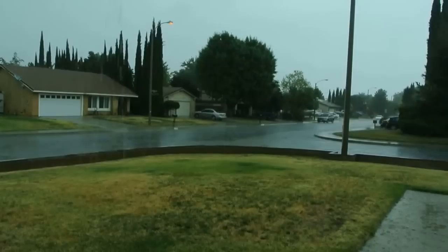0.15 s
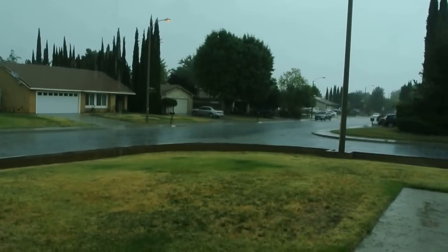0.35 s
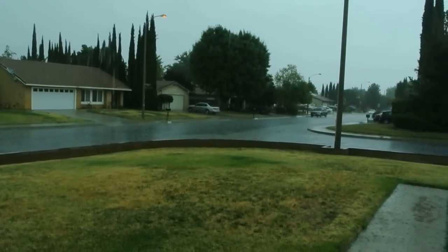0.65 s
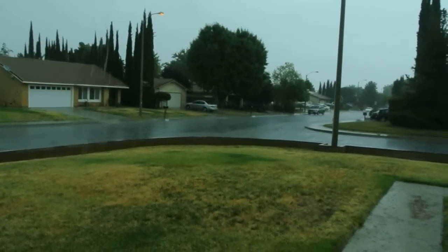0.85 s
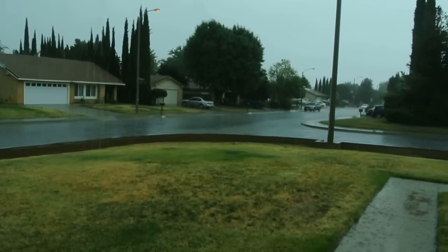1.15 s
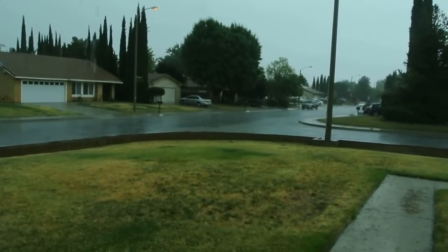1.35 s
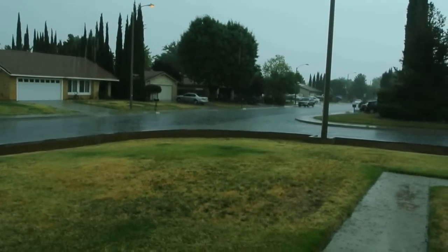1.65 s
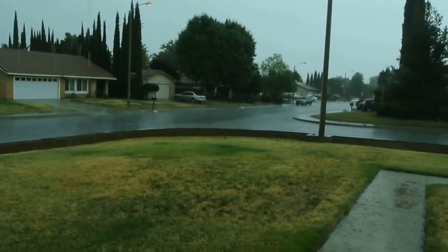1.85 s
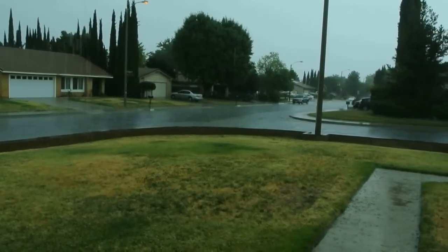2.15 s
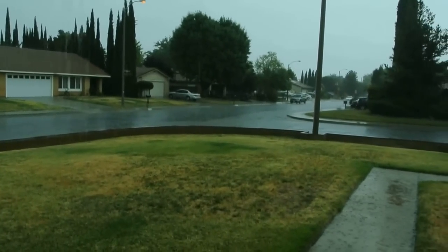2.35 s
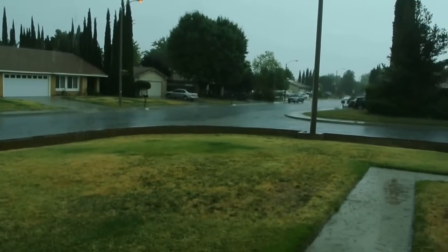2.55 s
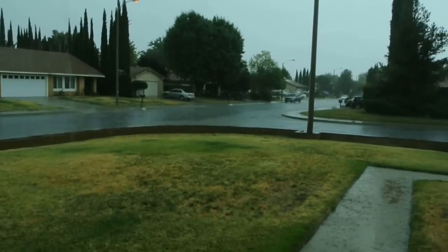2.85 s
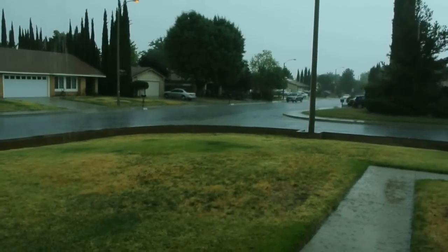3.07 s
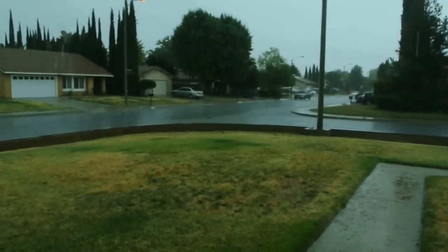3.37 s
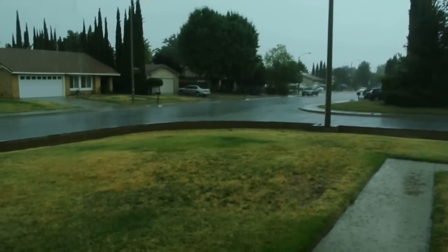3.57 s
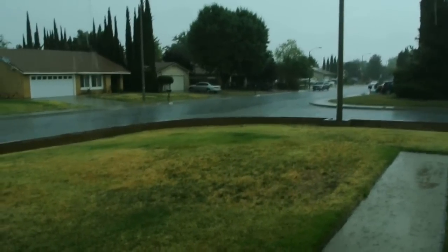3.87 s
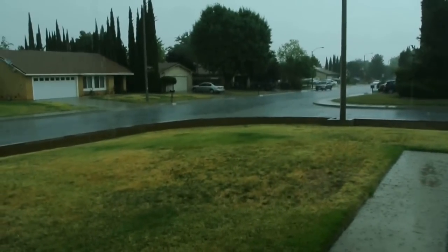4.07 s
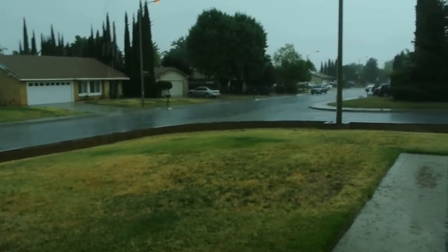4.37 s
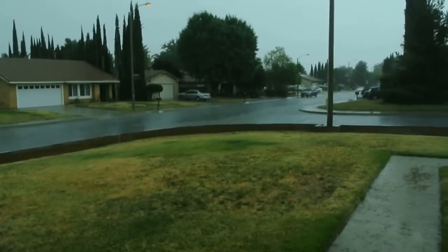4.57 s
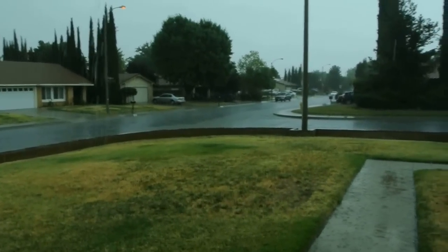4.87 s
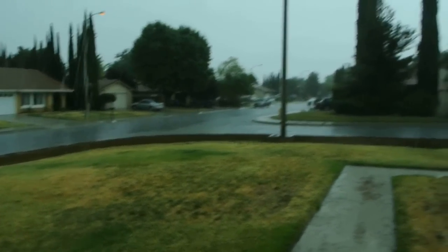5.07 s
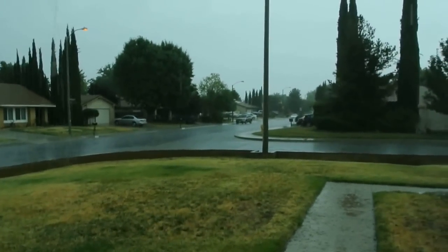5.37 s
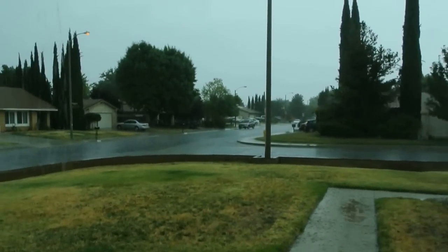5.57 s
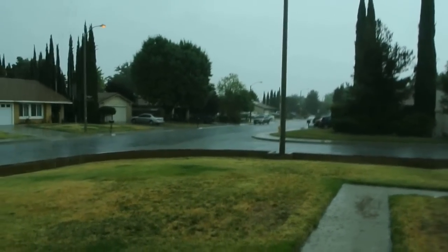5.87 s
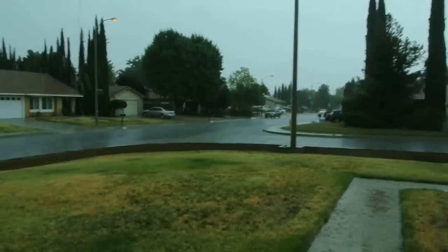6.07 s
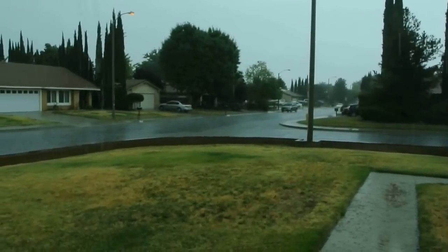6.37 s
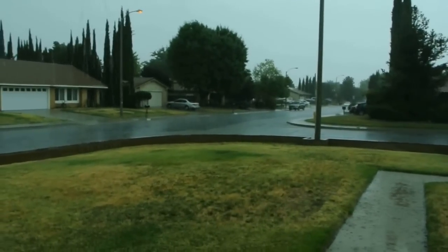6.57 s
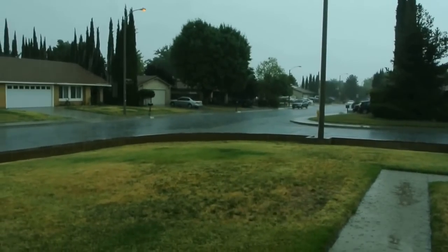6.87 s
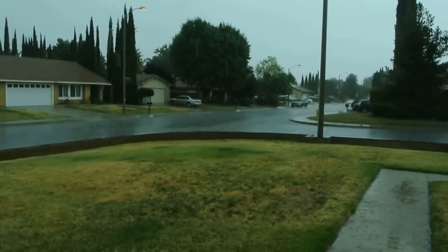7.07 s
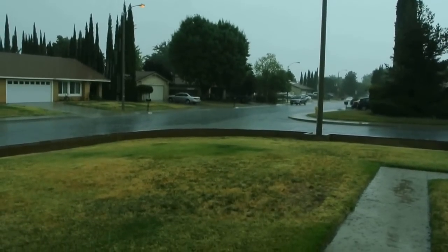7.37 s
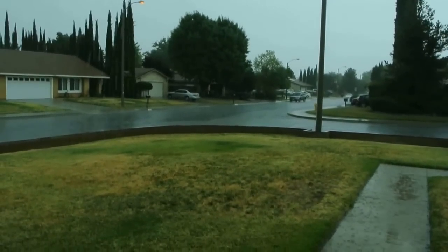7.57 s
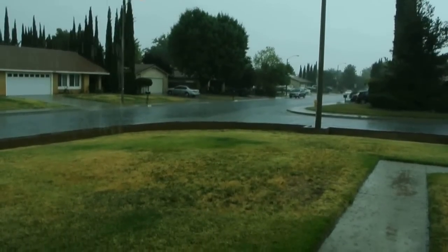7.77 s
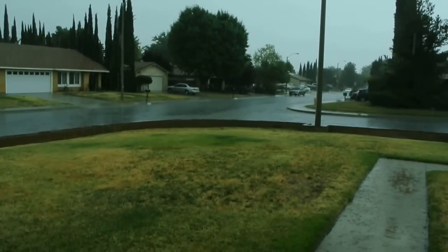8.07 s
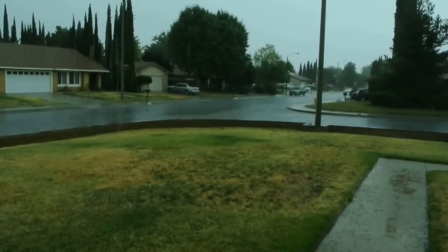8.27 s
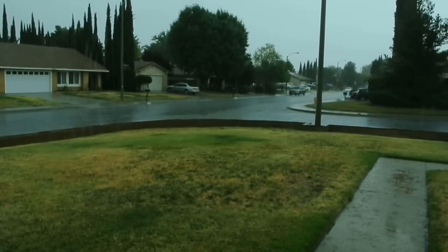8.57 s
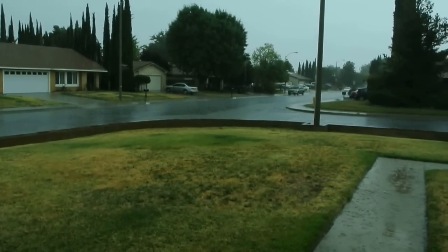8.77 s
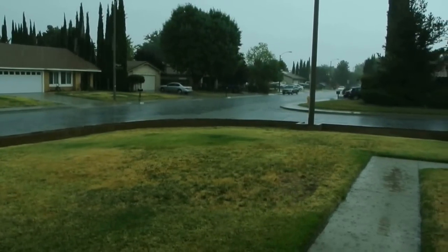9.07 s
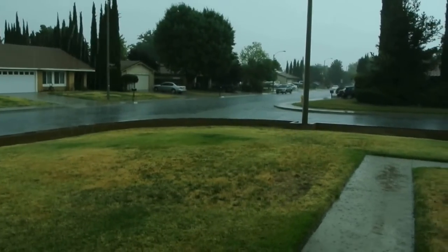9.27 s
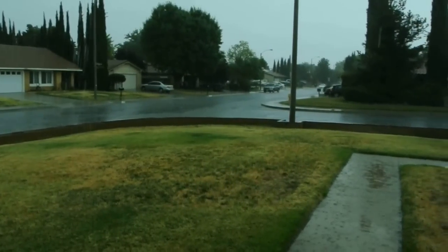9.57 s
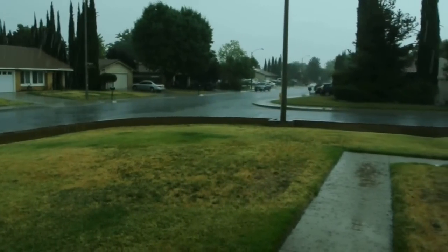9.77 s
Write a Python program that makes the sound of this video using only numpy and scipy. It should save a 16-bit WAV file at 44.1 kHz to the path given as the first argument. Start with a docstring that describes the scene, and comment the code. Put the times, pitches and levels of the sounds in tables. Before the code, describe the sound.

Continuous rainfall in a quiet residential street, already running at the start and unchanged at the end. Fine, bright hiss blends with fast grainy patter of near drops on grass and paving. Random tiny clicks jump between the two sides, along with sharper cracks on hard ground and little rounded plops in puddles. Low wash is weak and drifts gently. Close, hand-held stereo pickup under a porch, with very short splashy reflections.

```python
"""Rain heard from a porch

Steady rain on a lawn, a path and a street, at a hand-held camera with two microphone ports.
Splats: large near drops, each a rising, roughened ring with a crack at contact.
Patter: a dense random stream of smaller near drops of 60 kinds. Hiss: far drops as wandering noise.
The porch, the ports and the way the camera is held colour patter and hiss; their level swells and dips.
"""
import sys
import numpy as np
from scipy import signal
from scipy.io import wavfile
from scipy.ndimage import uniform_filter1d

SR = 44100
rng = np.random.default_rng(int(sys.argv[2]) if len(sys.argv) > 2 else 0)


def magnitude_from_level(level_db):
    """Linear magnitude for a level in decibels (20 dB per decade)."""
    exponent = np.asarray(level_db, float) / 20
    return 10 ** exponent


def master(y):
    """Save y as 16-bit WAV."""
    cut = np.clip(np.atleast_2d(y).T, -1, 1)
    pcm = np.round(cut * 32767)  # scale
    wavfile.write(sys.argv[1], SR, pcm.astype(np.int16))


N = 437913  # samples
HOP = 128  # samples


def evened(x):
    """Scales to rms 1."""
    return x / np.sqrt(np.mean(x ** 2) + 1e-20)


def smooth_noise(count, span):
    """Slow random drift of rms 1: white noise averaged over span steps."""
    return evened(uniform_filter1d(rng.standard_normal(count), size=span))


def read(points, hz):
    """Reads every column of a spectrum table at hz, interpolating over log frequency."""
    f, *columns = np.transpose(points)
    return np.array([np.interp(np.log(hz + 1), np.log(f + 1), c) for c in columns])


def bumps(table, hz):
    """Sums bell-shaped rises and dips in dB, one row per dB column."""
    return sum(np.outer(db, np.exp(-(2 * (hz - f) / width) ** 2)) for f, width, *db in table)


def below(corner_hz, hz):
    """Weight that falls from 1 in the bass to 1/2 at corner_hz and on towards 0."""
    return 1 / (1 + (hz / corner_hz) ** 2)


def add(mix, s, sound):
    """Mixes a two-channel sound in at time s."""
    part = mix[:, round(s * SR):][:, :sound.shape[1]]
    part += sound[:, :part.shape[1]]


def tick(hz, ms, glide, rough, crack, noise):
    """One impact: a rising ring that many droplets roughen, and a wide crack at first contact."""
    t = np.arange(noise.shape[1]) / SR
    u = t / (ms / 1000)
    envelope = np.e * 2.67 * u * np.exp(-3.5 * u)
    ring = np.sin(2 * np.pi * hz * t * (1 + glide * (np.minimum(u, 2) - .6)))
    droplets = evened(uniform_filter1d(noise[0], size=max(round(1.5 * SR / hz), 2)))
    body = envelope * ring * (1 + rough * droplets) / np.sqrt(1 + rough ** 2)
    contact = np.diff(noise[1], prepend=0) * np.exp(-t / 0.00045)
    return body + crack * contact


def splash(x, db, t60):
    """Adds the spray and near echoes that trail each impact: decaying noise, different at each port."""
    t = np.arange(SR // 10) / SR
    decay = magnitude_from_level(-60 * t / max(t60, .005)) * (t > .001)
    tail = rng.standard_normal((2, len(t))) * decay
    trail = signal.oaconvolve(x, tail / np.linalg.norm(tail[0]), axes=1)[:, :N]
    return x + magnitude_from_level(db) * trail


# left-right likeness of the rain: f/Hz, likeness [0..1]
LIKENESS = [(60, 1), (250, 0.94), (480, 1), (950, 0.65), (1890, 0.44), (3770, 0.28), (7520, 0.15),
            (15000, 0.074)]


def likeness(hz):
    """Low sound reaches both ports alike, high sound less so."""
    return read(LIKENESS, hz)[0]


def splats():
    """Large drops close by: short ones crack, long ones plop or spatter."""
    drops = plops() + cracks() + small_cracks()
    out = np.zeros((2, N))
    for (s, db, hz, pan_db, ms), noise in zip(drops, rng.standard_normal((len(drops), 3, 2, 2048))):
        same = np.clip(likeness(hz), 0, 1)
        ports_noise = np.sqrt(same) * noise[2] + np.sqrt(1 - same) * noise[:2]
        rough = .07 * ms * (hz / 2000) ** 1.2  # low plops ring cleanly, high spatters break up
        pair = [tick(hz, ms, .06, rough, .4 / ms, n) for n in ports_noise]
        pan = np.minimum([[pan_db], [-pan_db]], 0)
        add(out, s, np.array(pair) * magnitude_from_level(db + pan))
    thin = signal.butter(2, 700, "high", fs=SR, output="sos")  # a drop is too small to push out bass
    return signal.sosfilt(thin, splash(out, -2.5, 0.064))


def crack_ms(hz):
    """Length of a crack: a fixed part plus some cycles of its ring."""
    fixed_ms, cycles = .65, 1.1
    return fixed_ms + 1000 * cycles / hz


# sharp cracks of large drops on hard ground: t/s, level/dB, f/Hz, left minus right/dB
HARD_HITS = [(0.168, -11, 1600, 2), (0.2785, -5.5, 5000, -6), (0.629, -11, 6460, -9),
             (0.832, -10, 3500, -1), (1.1556, -5, 12400, 10), (1.2187, -9, 4400, -13),
             (1.3549, -8, 3800, -10), (1.4614, -6, 4400, -5), (2.2107, -11, 6460, -8),
             (2.226, -9, 10500, -6), (2.7693, -5, 5800, -7), (4.3255, -8, 6460, -6),
             (4.6028, -8, 13000, -6), (4.6084, -7, 14200, 4), (5.1286, -9, 8150, -4),
             (5.1344, -6, 10300, -1), (5.3905, -9, 10200, 2), (5.843, -7, 11300, -4),
             (5.8561, -11, 10400, 0), (5.9588, -5.5, 2300, -3), (5.9624, -9, 8400, -5),
             (5.9642, 0, 4260, -3), (6.0081, -11, 5120, -4), (6.1393, -7, 13400, 3), (6.2236, -8, 11000, 3),
             (6.2895, -8, 10900, -1), (6.7067, -8, 7800, 1), (7.1563, -9, 12200, 3),
             (7.2113, -10, 12100, -1), (7.7728, -4, 6500, -10), (7.9272, -12, 11800, 2),
             (8.0596, -5, 6400, 6), (8.8141, -7, 6400, -7), (8.8335, -8, 12200, 5), (9.266, -10, 3300, -3),
             (9.4668, -5, 14900, 7)]


def cracks():
    """Large drops on hard ground: very short rings, about a millisecond long, at set times."""
    return [(s, db, hz, pan_db, crack_ms(hz)) for s, db, hz, pan_db in HARD_HITS]


# plops and spatters into standing water: t/s, level/dB, f/Hz, left minus right/dB, length/ms
WATER_HITS = [(0.168, -21, 2020, 2, 26), (0.312, -18, 1694, 5, 19), (0.333, -16, 2570, -3, 14),
              (0.5651, -19, 2060, -6, 5), (0.7095, -13, 2500, -6, 4), (0.814, -21, 2064, 1, 25),
              (1.0915, -24, 2380, -1, 21), (1.319, -23, 2035, 1, 22), (1.356, -18.5, 4500, -4, 28),
              (1.776, -24, 2040, 7, 25), (1.997, -16, 2520, 5, 8), (2.526, -14, 3210, -1, 4),
              (2.739, -13, 3210, 6, 2.5), (3.098, -20, 3320, -5, 29), (3.354, -15, 2520, 3, 4),
              (3.7594, -18, 2540, 6, 5), (4.4116, -24, 1350, 3, 19), (4.9, -21.5, 2100, -2, 28),
              (4.905, -19, 4510, -6, 16), (5.5094, -18.5, 2300, -5, 23), (5.9593, -18, 1895, -5, 20.4),
              (6.0485, -11, 2460, -14, 3.2), (6.592, -17, 3300, -5, 3.6), (7.1457, -18, 1680, -4, 20),
              (7.516, -18, 1453, -3, 14), (7.82, -19.5, 2060, 2, 18), (7.93, -25, 1670, 0, 14),
              (8.293, -17, 1610, -10, 6), (8.969, -24, 2040, -5, 27), (9.259, -18.5, 2790, -5, 11),
              (9.6126, -26, 2040, 1, 19), (9.7446, -16, 3210, -3, 5.3)]


def plops():
    """Drops into standing water: each starts with a lower, shorter, weaker ring beneath its main one."""
    hz_ratio, under_db, length_ratio = .7, -4, 0.57
    unders = [(s, db + under_db, hz * hz_ratio, pan_db, ms * length_ratio)
              for s, db, hz, pan_db, ms in WATER_HITS]
    return WATER_HITS + unders


def small_cracks(per_s=9, least_db=-18, spread_db=2, low_hz=2440, octaves=2.42, pan_scale_db=7):
    """Lesser cracks: random times, pitches and sides, many weak and few strong."""
    s, size, pitch, side = rng.random((round(per_s * N / SR), 4)).T
    db = least_db - spread_db * np.log(1 - .9 * size)
    hz = low_hz * 2 ** (octaves * pitch)
    pan_db = pan_scale_db * (2.8 * side - 2)
    return list(zip(s * N / SR, db, hz, pan_db, crack_ms(hz)))


def patter(per_s=1200, spread_db=3.5, tilt_db_per_octave=2.5, count=60):
    """Near drops on grass and paving: random ticks, each kind with its own pitch, length and direction."""
    flurries = magnitude_from_level(3.5 * smooth_noise(N, 900))
    lands = rng.random(N) < flurries * per_s / SR
    size = magnitude_from_level(spread_db * np.minimum(rng.exponential(1, N), 4.4)) * lands
    kind = rng.integers(0, count, N)
    out = np.zeros((2, N))
    for k, (pitch, cycles, side) in enumerate(rng.random((count, 3))):
        octaves = 3.5 * ((k + pitch) / count) ** .8
        hz = 1250 * 2 ** octaves
        ms = 0.38 + 1000 * (0.85 + 2.4 * cycles) / hz
        sound = tick(hz, ms, 0.23, 0.88, 0.28, rng.standard_normal((2, 512)))
        sound = magnitude_from_level(tilt_db_per_octave * octaves) * sound / np.linalg.norm(sound)
        drops = signal.oaconvolve(size * (kind == k), sound)[:N]
        lag = round(8 * side - 2)  # samples, left after right
        out += [np.roll(drops, lag) * magnitude_from_level(5.5 - 11 * side), drops * magnitude_from_level(12.7 * side - 5.5)]
    return evened(splash(out, -3, 0.03))


# phase between the ports: f/Hz, left lead/rad
PHASE_LEAD = [(0, 0), (1720, -.45), (5510, -2.5), (16000, -3.4)]


def hiss(patchy_db=0.66, flicker_db=0.79, lull_db=1.5):
    """Countless far drops: noise with drifting patches, a wide-band flicker and slow lulls in the low wash."""
    frames, hz = N // HOP + 5, np.fft.rfftfreq(4 * HOP, 1 / SR)
    a, b, c, d, patches = rng.standard_normal((frames, len(hz), 5)).T
    patches = uniform_filter1d(patches, size=14, axis=0)  # over frequency
    patches = evened(uniform_filter1d(patches, size=12, axis=1))  # over time
    flicker, lulls = smooth_noise(frames, 6), smooth_noise(frames, 30)
    same = np.clip(likeness(hz), -1, 1)[:, None]
    lead = read(PHASE_LEAD, hz)[0][:, None]
    left = a + 1j * b
    right = same * left * np.exp(-1j * lead) + np.sqrt(1 - same ** 2) * (c + 1j * d)
    wander_db = patchy_db * patches + flicker_db * flicker + lull_db * np.outer(below(600, hz), lulls)
    z = np.array([left, right]) * magnitude_from_level(wander_db)
    return evened(signal.istft(z, nperseg=4 * HOP, noverlap=3 * HOP)[1][:, :N])


# colour of the rain at each port: f/Hz, left level/dB, right level/dB
PORT_COLOUR = [(25, -42, -44), (60, -22, -21), (96, -25, -25.5), (156, -16.5, -16), (398, -11, -10.5),
               (814, -8, -8), (1780, -5, -3.5), (3040, -4, -3.5), (5000, -3, -2), (7500, -3, -2),
               (9500, -1.5, -5), (12000, -0.5, -3), (14300, -2, -4), (16600, -7.5, -9)]
# standing waves under the porch: f/Hz, width/Hz, level/dB
PORCH_MODES = [(245, 34, 2.5), (307, 55, -3), (384, 22, 2), (570, 36, -4), (1030, 70, 0), (1710, 100, 1.5),
               (1760, 38, -1)]


def place_db(hz):
    """Steady colour: the response of each port plus the standing waves under the porch."""
    return read(PORT_COLOUR, hz) + bumps(PORCH_MODES, hz)


# shading of the ports by hand and body, first hold: f/Hz, width/Hz, left level/dB, right level/dB
HOLD_A = [(3500, 3100, 2, 0.35), (6000, 3300, 0.1, 1.2), (9000, 3000, -2, 0), (12200, 1500, 1.2, -0.5)]
# the same in the second hold: f/Hz, width/Hz, left level/dB, right level/dB
HOLD_B = [(3500, 2700, 1, 0.16), (6500, 3200, 2.4, 0.73), (9500, 1400, 1.1, .3)]
# how far each hold applies: t/s, weight of first hold [ratio], weight of second hold [ratio]
HOLD_WEIGHTS = [(0, 0.99, .01), (3.15, 1.4, .01), (3.45, .01, 0.95), (4.6, .01, 0.73), (5.1, .01, .01),
                (9.93, .01, .01)]


def hold_db(hz, t):
    """Hand and body shade each port; the shading shifts as the camera is turned."""
    s, first, second = np.transpose(HOLD_WEIGHTS)
    first_db = bumps(HOLD_A, hz)[:, :, None] * np.interp(t, s, first)
    second_db = bumps(HOLD_B, hz)[:, :, None] * np.interp(t, s, second)
    return first_db + second_db


# bass against the rest: t/s, level/dB
BASS_DRIFT = [(0, 1.3), (4.5, 1.4), (6.3, -2), (6.9, 0), (7.5, -1.5), (8.3, .6), (9.93, -0.8)]


def low_wash_db(hz, t):
    """Slow drift of the bass, fading out above 900 Hz."""
    return np.outer(below(900, hz), np.interp(t, *np.transpose(BASS_DRIFT)))


def ports(x):
    """Filters each channel by the porch, its port, the hold and the bass drift."""
    hz, t, z = signal.stft(x, SR, nperseg=2048)
    db = place_db(hz)[:, :, None] + hold_db(hz, t) + low_wash_db(hz, t)
    return signal.istft(z * magnitude_from_level(db), SR, nperseg=2048)[1][:, :N]


# slow loudness of hiss and patter together: t/s, level/dB
SWELL = [(0, -19), (1.0, -19), (1.25, -20), (2.25, -18.5), (3.6, -19), (3.92, -20.2), (4.2, -17.5),
         (4.4, -20), (4.95, -19), (5.7, -20), (6.45, -20.5), (6.58, -18.5), (6.8, -21), (7.18, -18.5),
         (8.0, -19), (8.55, -20.5), (8.7, -19.5), (9.28, -18.5), (9.93, -20)]
# sudden drops in level, mostly just after a sharp crack: t/s, nominal depth/dB
LEVEL_DIPS = [(0.35, 1.5), (2.78, 3), (2.83, 2.5), (4.61, 3.5), (5.39, 1), (5.86, 2.5), (6.15, 0),
              (7.22, 2.5), (7.83, 3), (8.07, 3), (8.84, 1.5), (9.48, 2.5)]


def loudness_db():
    """The slow level, less each dip: a quick fall, then a gradual return."""
    fall_s, back_s = 0.0091, 0.13
    t = np.arange(0, N, HOP) / SR
    db = np.interp(t, *np.transpose(SWELL))
    for s, depth_db in LEVEL_DIPS:
        since = np.maximum(t - s, 0)
        db = db - depth_db * np.minimum(since / fall_s, 1) * np.exp(-since / back_s)
    return np.interp(np.arange(N) / SR, t, db)


def scene():
    """Hiss and patter swell together; the splats land on top."""
    rain = evened(ports(hiss() + magnitude_from_level(-7.0) * patter()))
    return rain * magnitude_from_level(loudness_db()) + splats()


def top_cut(x):
    """Nothing passes above the cut-off."""
    return signal.sosfilt(signal.butter(12, 16490, fs=SR, output="sos"), x)


def record(dry):
    """Limits the band with a steep linear-phase low-pass."""
    edge = signal.firwin(1023, 15770, window=("kaiser", 10), fs=SR)
    mix = signal.oaconvolve(dry, edge[None], "same", axes=1)
    return top_cut(mix)


dry = scene()
out = record(dry)
master(out)
```